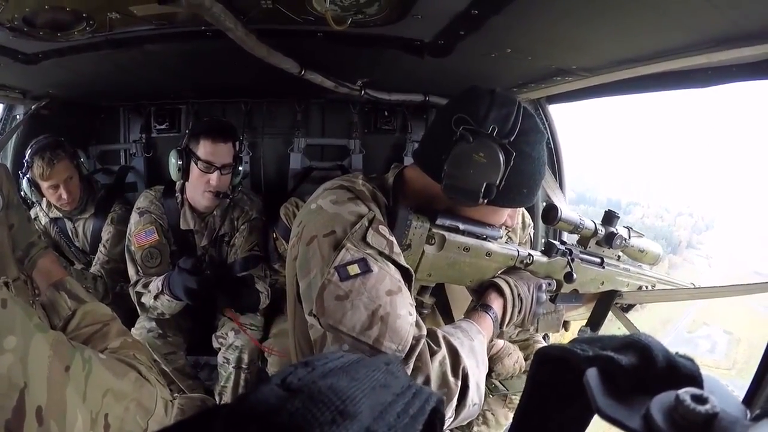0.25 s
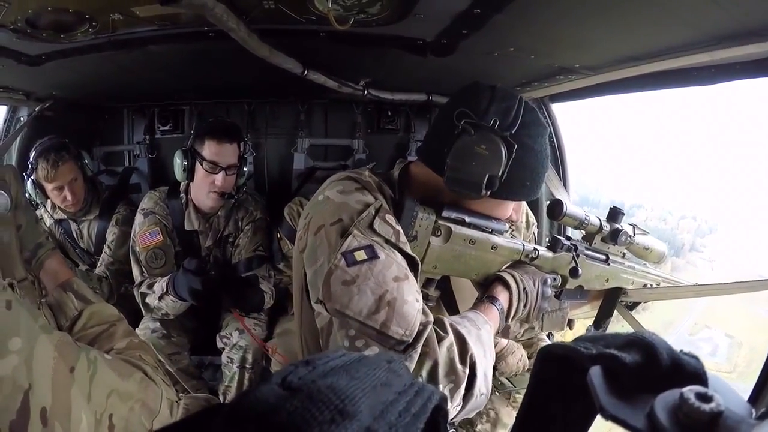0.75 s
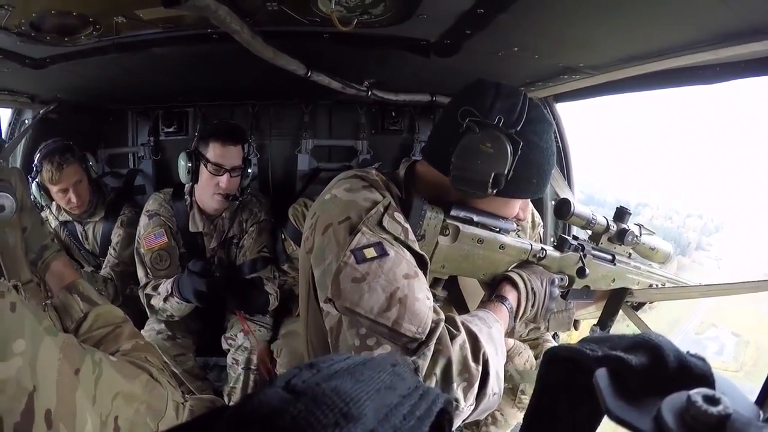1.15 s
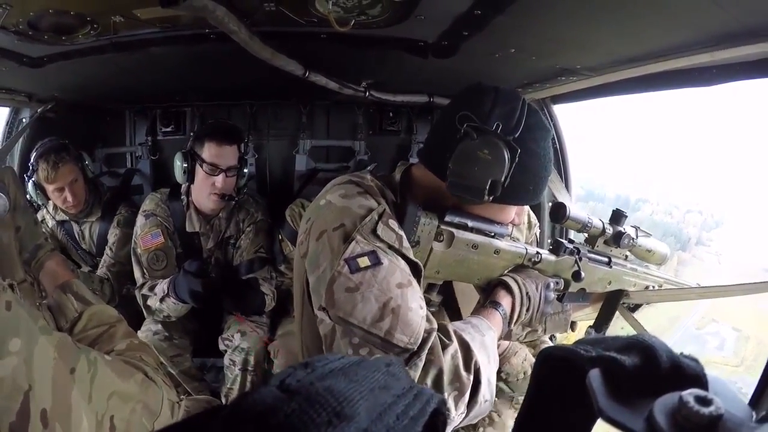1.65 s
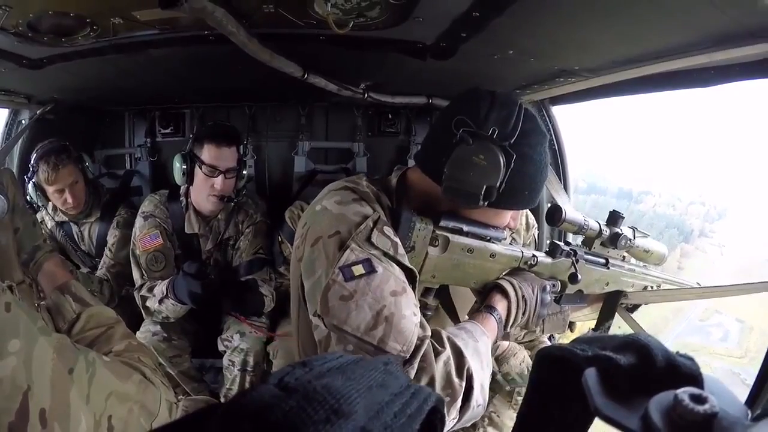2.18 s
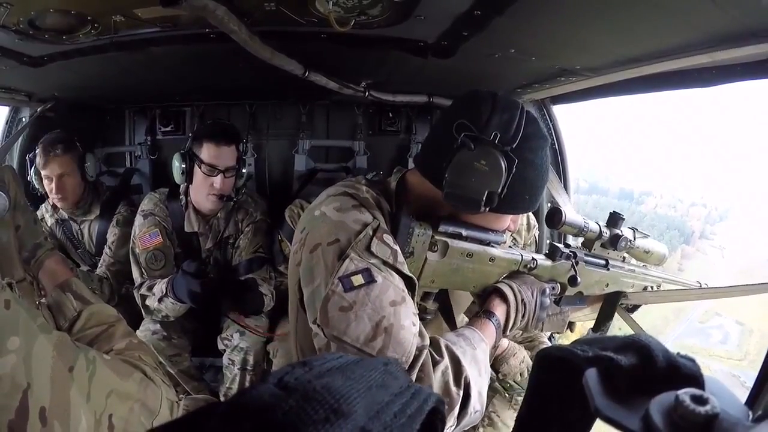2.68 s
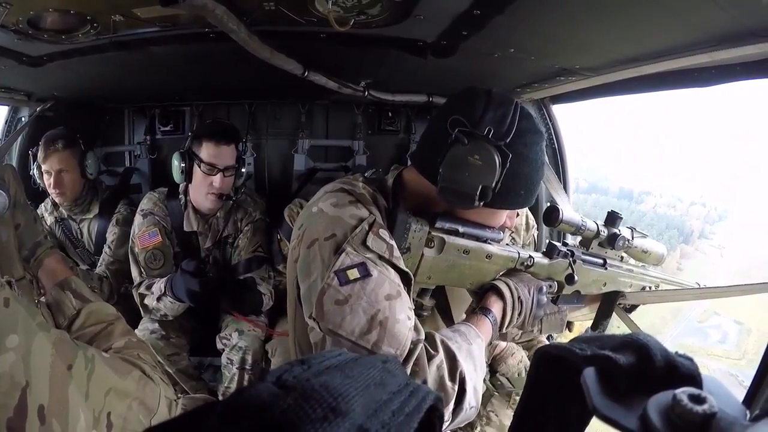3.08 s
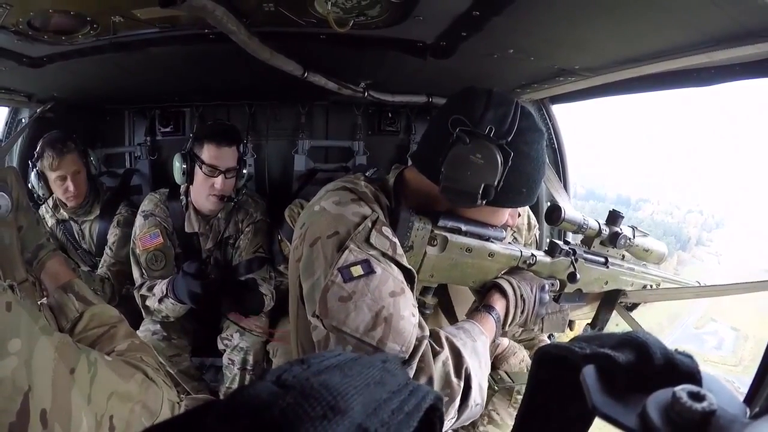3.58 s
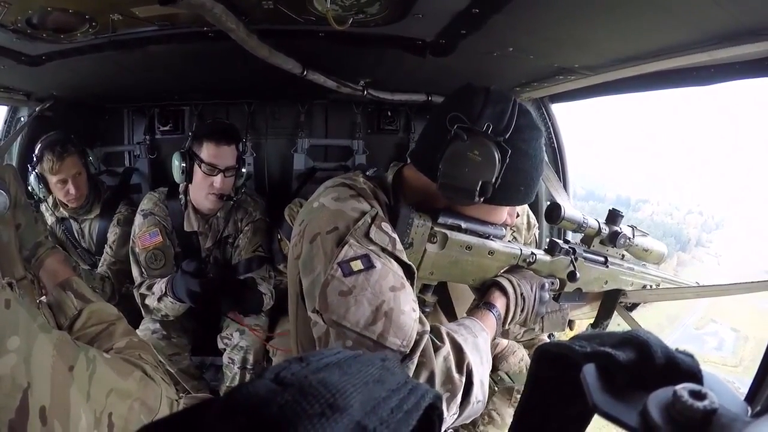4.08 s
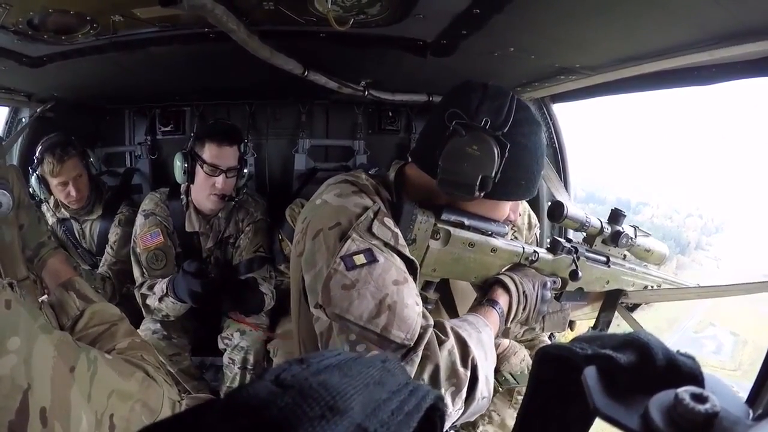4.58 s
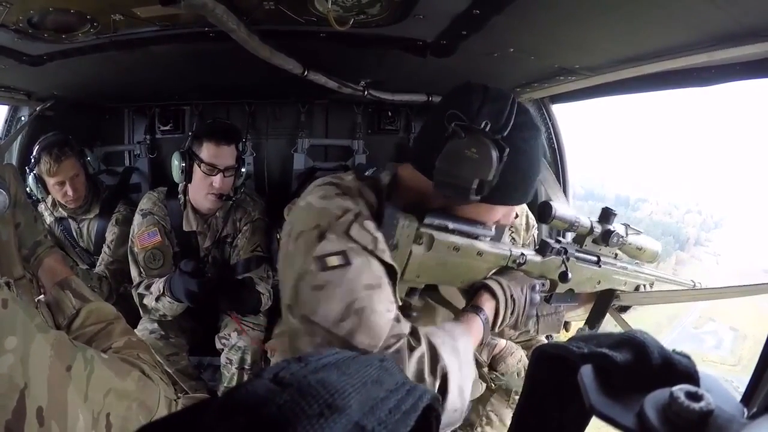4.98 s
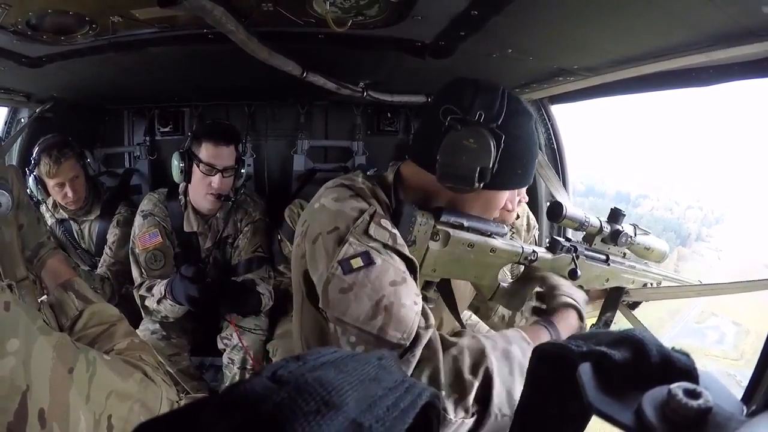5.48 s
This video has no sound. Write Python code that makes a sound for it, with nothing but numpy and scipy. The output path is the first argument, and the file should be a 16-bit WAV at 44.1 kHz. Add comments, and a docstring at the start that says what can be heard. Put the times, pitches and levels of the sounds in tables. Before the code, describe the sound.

A dense, steady helicopter cabin: low pulsing rotor beat, flickering wind roar, piercing mid-high gear and pump whine, and thin turbine hiss. Nothing else happens until one hard, clipped gunshot near the end. It dies almost at once in the tight cabin, leaving the engine noise suddenly quieter, then rising again. Heard from a small overloaded onboard microphone.

```python
"""A rifle shot bursts and rings briefly inside a hovering helicopter with its door open.
Blades thump as harmonics over deep rumble, downwash roars as flickering octaves of noise,
gears and a pump whine as wavering tones, and turbine whistles are narrow to broad noise bands.
The blast clips the recorder; gain control ducks just ahead of it and lets the cabin noise creep back."""
import sys
import numpy as np
from scipy import signal
from scipy.fft import rfft, irfft
from scipy.io import wavfile
from scipy.ndimage import uniform_filter1d, minimum_filter1d

SR = 44100
rng = np.random.default_rng(int(sys.argv[2]) if len(sys.argv) > 2 else 0)


def transcribe(u):
    """Save the signal u as a 16-bit wav file named by the first command-line argument.

    u: samples, shape (n,) or (channels, n), limited to [-1, 1]; the rate is SR.
    q: integer samples, one column per channel.
    """
    v = np.clip(np.atleast_2d(u).T, -1, 1)
    q = np.round(v * 32767).astype(np.int16)
    wavfile.write(sys.argv[1], SR, q)


def invert_db(level):
    """Linear amplitude ratio for a level in decibels (20 dB per decade), elementwise."""
    return 10 ** (np.asarray(level, dtype=float) / 20)


N = 253128
T = np.arange(N) / SR
F = np.maximum(np.arange(N // 2 + 1) * SR / N, 1)
NOMINAL_MESH_HZ = 3272.2  # main gear mesh at nominal drive speed


def level(x, db):
    """Scale to an rms level."""
    return x * invert_db(db) / np.sqrt(np.mean(x ** 2))


def shape(x, gain):
    """Weight the spectrum by a gain per frequency."""
    return irfft(rfft(x) * gain, N)


def colour(points):
    """Gain per frequency, drawn through (Hz, dB) points on a log frequency axis."""
    hz, db = np.transpose(points)
    return invert_db(np.interp(np.log(F), np.log(hz), db))


def walk(rate):
    """Random levels held 1 / rate s and slewed twice; zero mean, spread 1."""
    hold = int(SR / rate)
    steps = np.repeat(rng.standard_normal(N // hold + 1), hold)
    slow = uniform_filter1d(uniform_filter1d(steps, hold), hold)[:N]
    return (slow - slow.mean()) / slow.std()


def tone(turns, db, waver_db, smear, rate):
    """A sine whose level (dB) and phase (radians) wander at rate changes per s."""
    phase = 2 * np.pi * (turns + rng.random()) + smear * walk(rate)
    return level(invert_db(waver_db * walk(rate)) * np.sin(phase), db)


def roar(blade_turns):
    """Octaves of air noise flicker alone; below about 1 kHz they swell in the trough of each blade wave."""
    # colour of downwash, exhaust and panels before the overall level: pitch_hz, level_db [dB per Hz]
    roar_colour = [(12, -28), (30, -8), (80, -3.5), (180, -6), (205, -10), (240, -6), (780, -7.5),
                   (1000, -17), (1400, -28), (2550, -29), (3300, -24), (3650, -32), (6400, -34.5),
                   (7800, -37.5), (12000, -37.5), (15400, -37)]
    roar_gain = colour(roar_colour)
    gust = walk(1.335)  # shared by all octaves
    out = 0
    for hz in 22 * 2. ** np.arange(10):
        octave = np.cos(np.pi / 2 * np.clip(np.log2(F / hz), -1, 1))
        throb_db = -1.6 * np.cos(2 * np.pi * blade_turns) / (1 + (hz / 1100) ** 4)
        flicker_db = 0.52 * gust + 0.46 * walk(15)
        air = shape(rng.standard_normal(N), octave * roar_gain)
        out = out + invert_db(throb_db + flicker_db) * air
    return level(out, -27.5)


def whistles():
    """Broad turbine whistles: white noise through a resonance each."""
    # resonances: pitch_hz, width_hz, level_db [rms]
    whistle_bands = [(13730, 130, -48), (13540, 1300, -46), (4175, 1050, -48.5), (1954, 61, -54),
                     (682, 22, -40.5), (167.8, 17, -39)]
    out = 0
    for hz, width_hz, db in whistle_bands:
        resonance = 1 / (1 + (2 * (F - hz) / width_hz) ** 2)
        out = out + level(shape(rng.standard_normal(N), resonance), db)
    return out


def pump():
    """The hydraulic pump hunts in speed, which smears its upper multiples more."""
    # pump tones: multiple of the piston rate, level_db [rms]
    pump_tones = [(2, -55), (4, -59.5), (6, -54.5), (8, -52.5), (9, -62.5), (11, -65.5), (12, -64),
                  (13, -74), (14, -61.5), (15, -65.5), (16, -62.5), (17, -72)]
    # tenth multiple, which fades and partly recovers: time_s, level_db [rms]
    tenth_fade = [(0, -47.5), (1.8, -50), (2.4, -53.5), (5.74, -52)]
    # flutter of every pump tone: level waver [dB], phase smear [radians], rate [changes per s]
    flutter = (3.5, .4, 90)
    piston_hz = 681.2
    piston_turns = piston_hz * T + 0.006 * walk(150) + 0.019 * walk(40) + 0.041 * walk(4)
    out = sum(tone(k * piston_turns, db, *flutter) for k, db in pump_tones)
    tenth_gain = invert_db(np.interp(T, *np.transpose(tenth_fade)))
    return out + tenth_gain * tone(10 * piston_turns, 0, *flutter)


def gears(shaft_s, blade_turns):
    """Gear and shaft tones follow the drive speed; shaft_s is time stretched by that speed."""
    # plain tones: pitch_hz [at nominal speed], level_db [rms]
    gear_tones = [(79.4, -43), (161.5, -45), (350, -43), (444.7, -54), (1331.6, -60.5), (1840, -63.5),
                  (1973, -63), (2343, -58), (2405.8, -57), (3405, -61), (3454, -62), (4780, -64),
                  (4908.8, -62.5), (5333, -66)]
    # meshes with side tones stepping down by the shaft rate: pitch_hz [at nominal speed],
    # swell_db [once a rotor turn], levels_db [rms before the swell: mesh, one step below, two below]
    shaft_meshes = [(993.2, 0.27, [-40, -45.5]), (1635.9, .4, [-51.5, -59]), (2980, 4.3, [-55.5, -58, -55])]
    shaft_hz, blades, swell_lag_turns = 21.2, 4, .115
    out = sum(tone(hz * shaft_s, db, waver_db=1.5, smear=0.32, rate=7) for hz, db in gear_tones)

    rotor_turn = np.cos(2 * np.pi * (blade_turns / blades - swell_lag_turns))
    for hz, swell_db, levels_db in shaft_meshes:
        for k, db in enumerate(levels_db):
            side_turns = (hz - k * shaft_hz) * shaft_s
            side_tone = tone(side_turns, db, waver_db=1.5, smear=0.35, rate=7.1)
            out = out + invert_db(swell_db * rotor_turn) * side_tone

    # a slightly eccentric gear makes the main mesh swell once a shaft turn
    eccentric = 1 + 0.23 * np.sin(2 * np.pi * shaft_hz * shaft_s + 0.78 * walk(4.78))
    mesh = eccentric * tone(NOMINAL_MESH_HZ * shaft_s, db=-43.0, waver_db=0.95, smear=0.3, rate=10.5)
    below_turns = (NOMINAL_MESH_HZ - shaft_hz) * shaft_s
    return out + mesh + tone(below_turns, db=-55, waver_db=1.5, smear=.4, rate=7.5)


def rotor(blade_turns):
    """A pressure wave per blade, plus rumble that partly repeats a little faster than the blades."""
    # blade wave: multiple of the blade rate, level_db [rms before the slow waver]
    blade_wave = [(1, -30), (2, -40.5), (3, -46)]
    # colour of the deep rumble before its overall level: pitch_hz, level_db
    rumble_colour = [(22, -25), (35, -1), (110, -0.5), (140, -4), (165, -1.5), (200, -10), (400, -23.5),
                     (900, -82)]
    skew_rad, repeat_hz = .48, 17.94
    wave = 0
    for k, db in blade_wave:
        lag = skew_rad * (k - 1) ** 2  # skews the wave
        wave = wave + np.sqrt(2) * invert_db(db) * np.cos(2 * np.pi * k * blade_turns + lag)
    # feedback comb: each repeat keeps 0.6 of the last
    repeats = 1 / (1 - 0.6 * np.exp(-2j * np.pi * F / repeat_hz))
    rumble = shape(rng.standard_normal(N), repeats * colour(rumble_colour))
    return wave * invert_db(0.64 * walk(3.12)) + level(rumble, -30.5)


def shot():
    """A noise burst per band that dies away in the cabin, treble first; bass takes longer to build."""
    # blast and cabin echo by band: pitch_hz, level_db [rms of the noise before build-up and decay]
    blast_bands = [(88, -10), (170, 7), (330, 7), (690, 12.5), (1400, -1), (3020, 8), (4340, 5),
                   (8060, 0.5), (11900, -15)]
    shot_s = 5.066
    treble_t60_s, bass_cycles = 0.057, 1.6  # 60 dB decay: fixed time plus periods of the band
    hold_cycles, longest_hold_s = 3.25, .019  # each band stays loud first
    age = np.maximum(T - shot_s, 0)
    out = 0
    for hz, db in blast_bands:
        bell = 1 / (1 + (1.88 * np.log(F / hz)) ** 4)
        band = level(shape(rng.standard_normal(N), bell), db)
        build = 1 - np.exp(-age * hz / 1.85)  # time constant of 1.85 cycles
        t60_s = treble_t60_s + bass_cycles / hz
        hold_s = min(hold_cycles / hz, longest_hold_s)
        decay = invert_db(-60 * np.maximum(age - hold_s, 0) / t60_s)
        out = out + band * build * decay
    return out


def scene():
    """Rotor, roar and gears share one drive speed, which sags slowly; pump, whistles and shot do not."""
    start_mesh_hz, sag_hz_per_s = 3275.7, 1.5
    mesh_per_blade, first_blade_turns = 189.36, -.372
    mesh_turns = np.cumsum(start_mesh_hz - sag_hz_per_s * T) / SR
    blade_turns = mesh_turns / mesh_per_blade + first_blade_turns
    machinery = whistles() + pump() + gears(mesh_turns / NOMINAL_MESH_HZ, blade_turns)
    return (roar(blade_turns) + machinery + rotor(blade_turns) + shot())[None]


def gain_control_db(x, ahead_s=0.021, hold_s=0.24, db_per_s=40.0):
    """Looks ahead, ducks under loud peaks, holds, then climbs back at a steady rate."""
    trigger_db, deepest_db = -8, -25
    ahead, hold = int(ahead_s * SR), int(hold_s * SR)
    peak_db = 20 * np.log10(np.abs(x) + 1e-9)
    need_db = np.clip(2 * (trigger_db - peak_db), deepest_db, 0)
    held_db = minimum_filter1d(need_db, hold, origin=(hold - 1) // 2)
    climb_db = db_per_s * T
    released_db = np.minimum.accumulate(held_db - climb_db) + climb_db
    return uniform_filter1d(released_db, ahead, mode="nearest", origin=-(ahead // 2))


def roll_off(x):
    """The treble ends steeply here."""
    return signal.sosfilt(signal.butter(12, 15550, fs=SR, output="sos"), x)


def record(dry):
    """Two-band gain control ducks the bass less, the blast still clips, and the top is cut."""
    clip_db, top_hz = -11.8, 15060
    duck_db = gain_control_db(dry[0])
    bass = shape(dry[0], 1 / (1 + (F / 260) ** 2))
    ducked = bass * invert_db(0.61 * duck_db) + (dry[0] - bass) * invert_db(duck_db)
    x = ducked / invert_db(clip_db)
    clipped = invert_db(clip_db) * x / (1 + x ** 6) ** (1 / 6)  # rounded knee
    mix = shape(clipped, F < top_hz)[None]
    return roll_off(mix)


dry = scene()
out = record(dry)
transcribe(out)
```